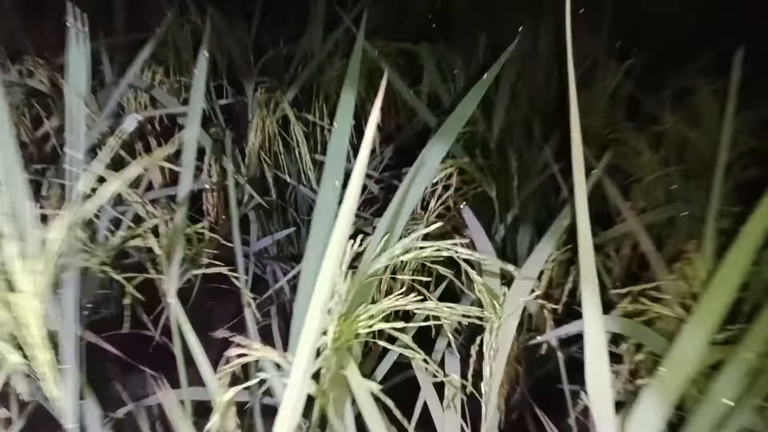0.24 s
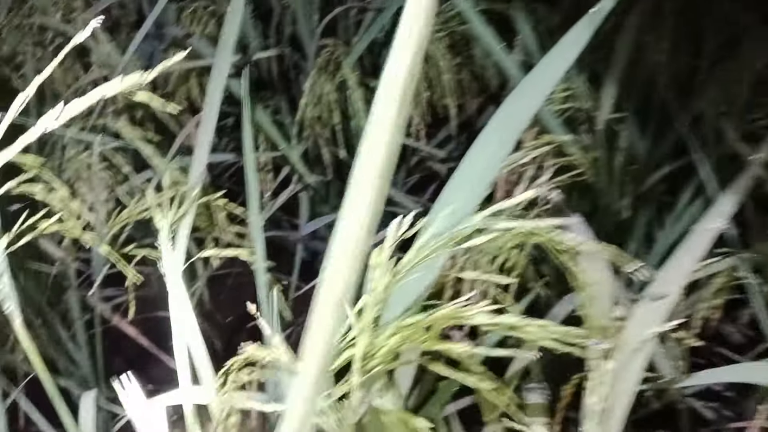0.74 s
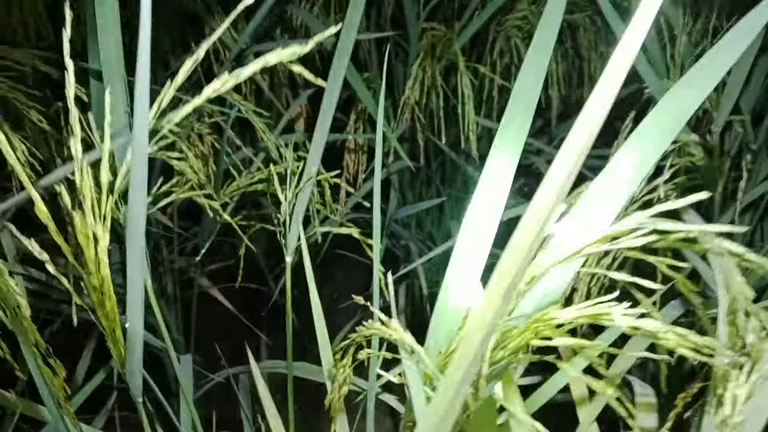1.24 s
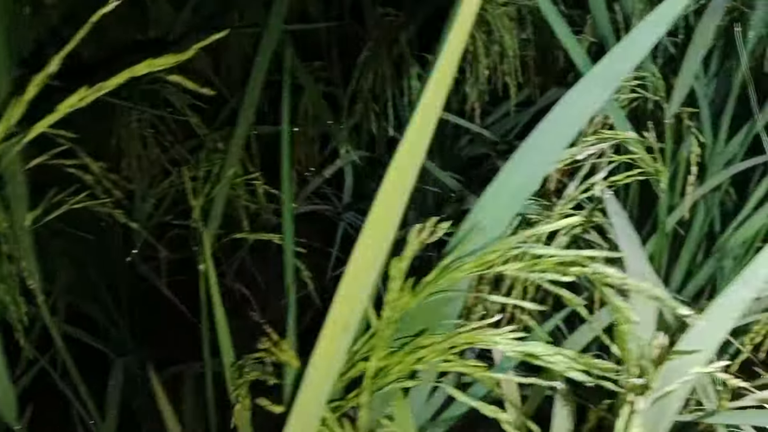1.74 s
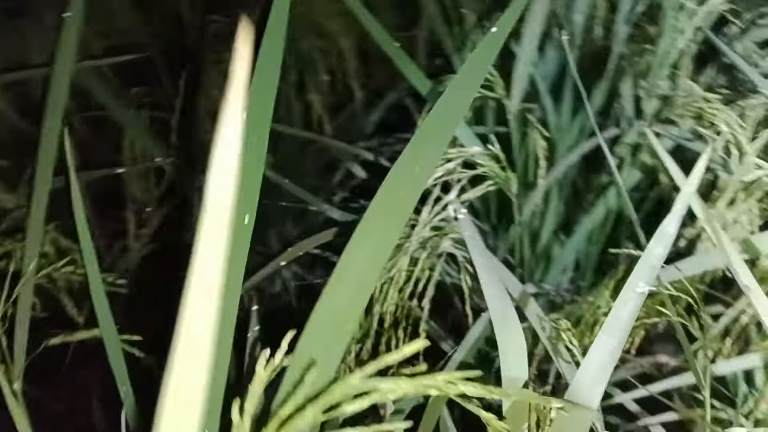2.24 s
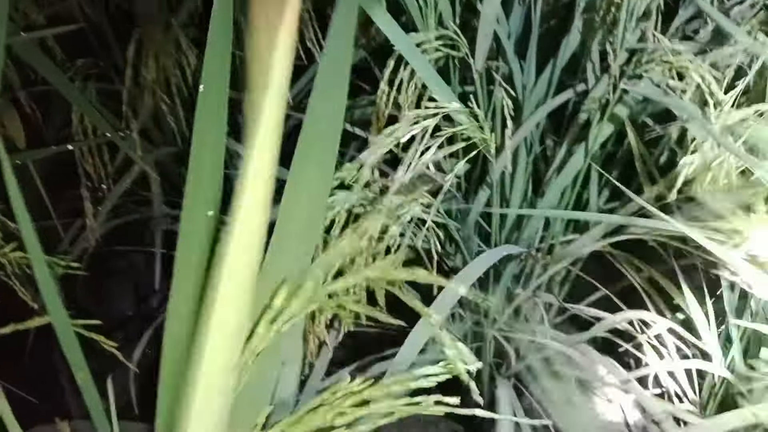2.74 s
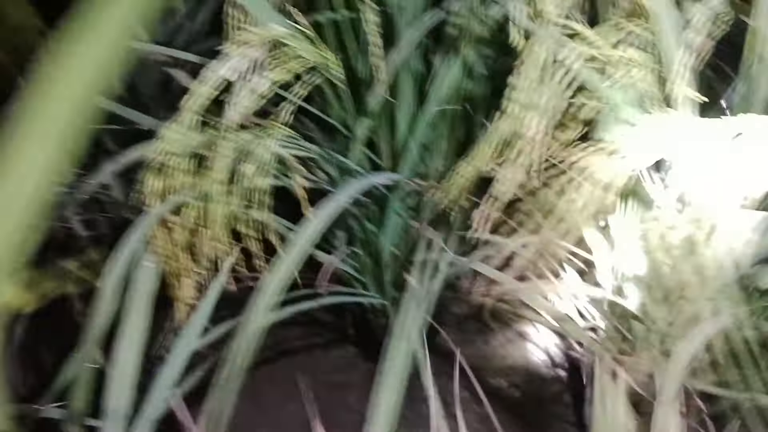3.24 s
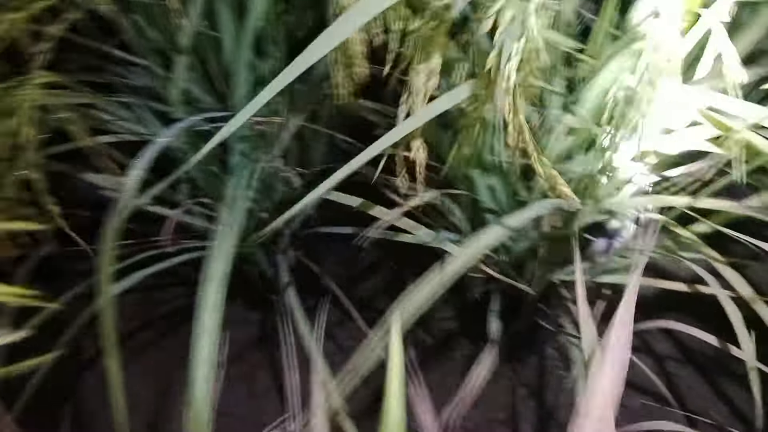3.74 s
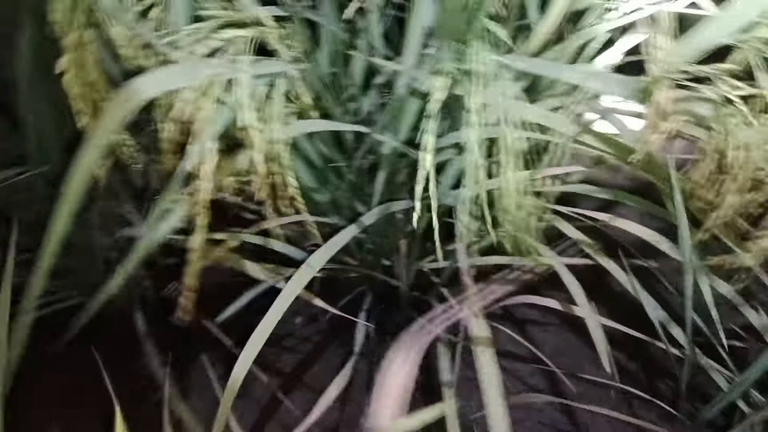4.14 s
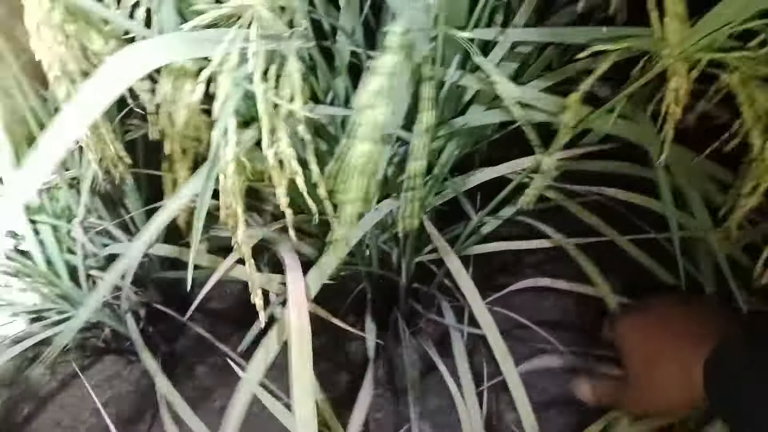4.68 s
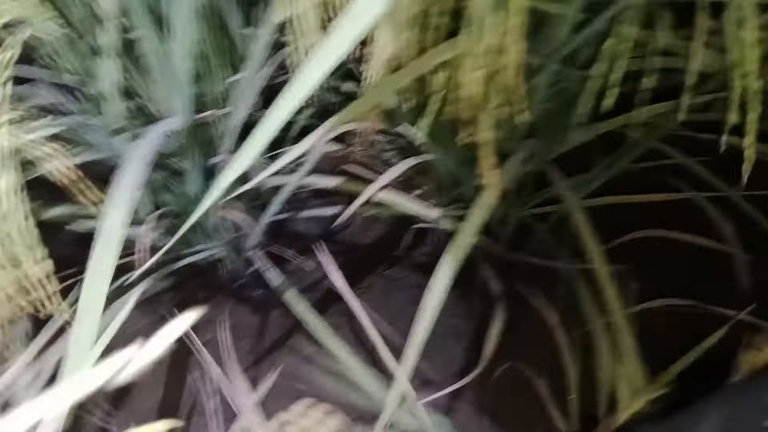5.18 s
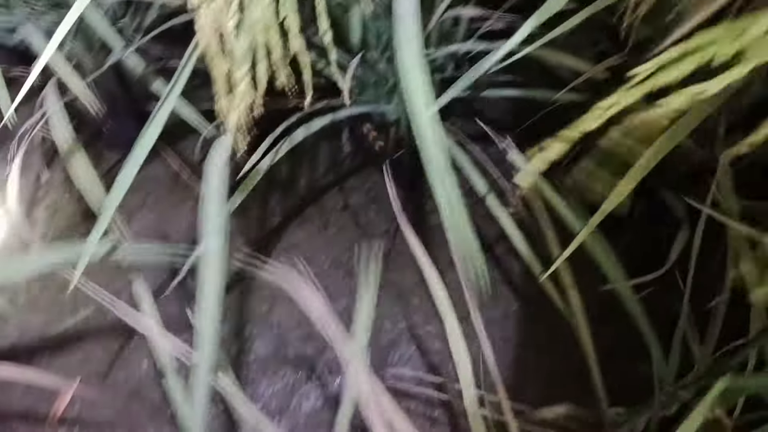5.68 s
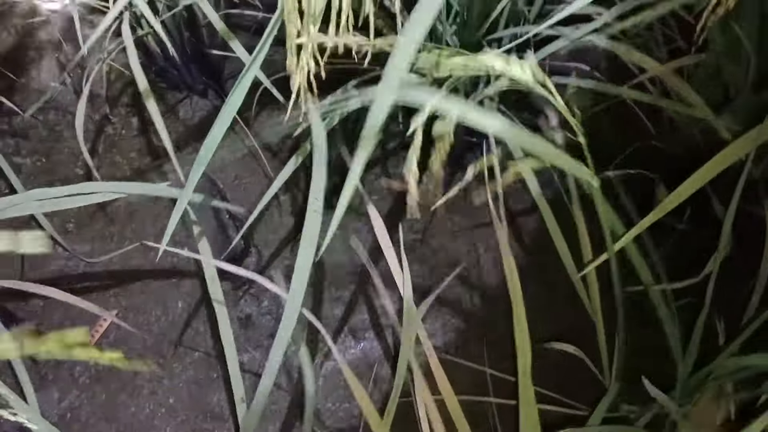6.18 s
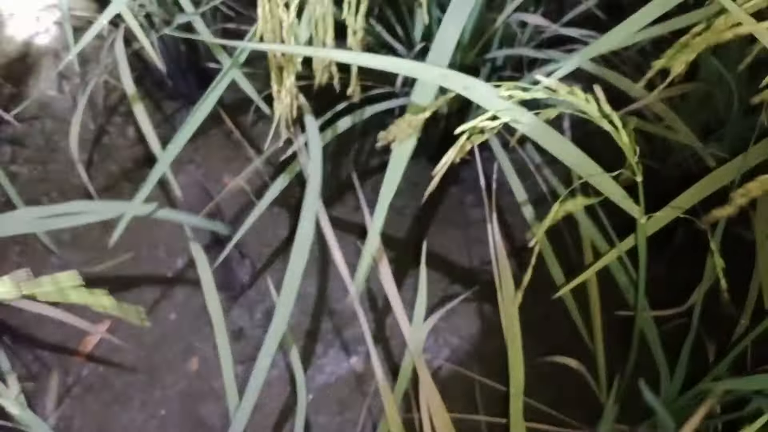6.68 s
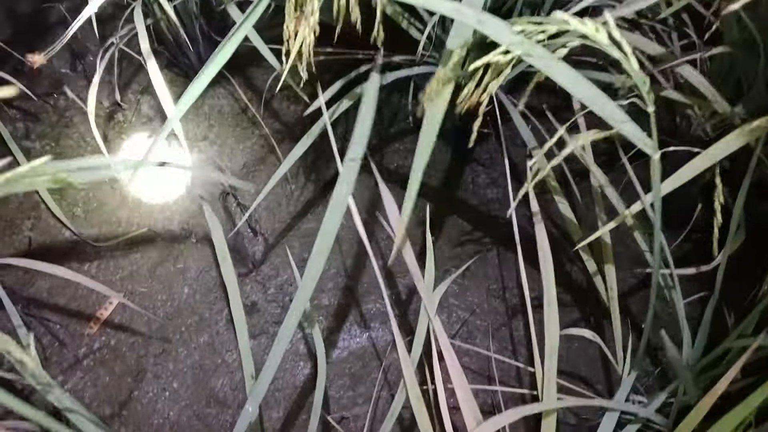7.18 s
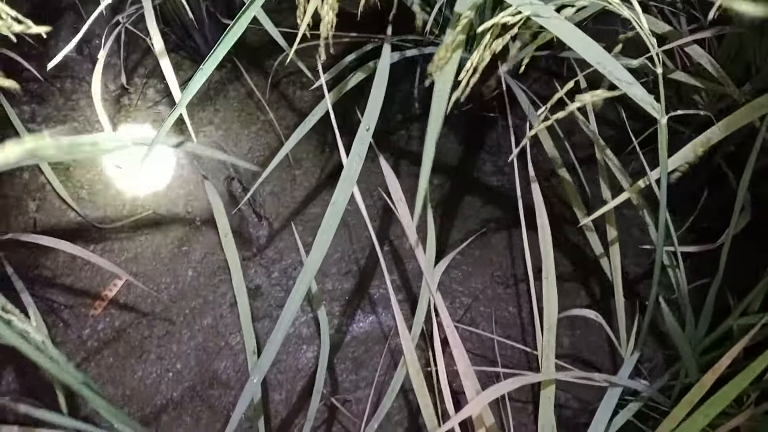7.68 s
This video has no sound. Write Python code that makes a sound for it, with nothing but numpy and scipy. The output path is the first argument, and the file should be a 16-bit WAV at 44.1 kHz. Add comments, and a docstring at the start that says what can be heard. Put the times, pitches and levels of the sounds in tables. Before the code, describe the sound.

Night in a rice paddy, heard close on a small handheld microphone. A mole cricket's rapid, rough trill runs throughout, with a higher, slower tree cricket pulsing in bouts behind. Leaves hiss and rustle at first, nearly stop, then swish strongly as a hand pushes through the stalks, with a cluster of dull knocks past five seconds. The rustling then fades, leaving insects, small leaf ticks and faint low air puffs.

```python
"""A mole cricket trills close by over the hiss of rice leaves, with a tree cricket trilling in bouts behind it.
It is night in a paddy: a hand pushes through the rice, stalks swish and knock, air buffets the microphone.
The crickets are trains of short swelling tones; other insects pipe single gliding notes.
Leaves, stalks and ears of grain are coloured noise mixed with clumped bursts; flicks are short bursts of noise.
Bumped stalks are damped sines with a noise snap; puffs and the far chorus are shaped noise."""
import sys
import numpy as np
from scipy import signal
from scipy.fft import rfft, irfft, next_fast_len
from scipy.io import wavfile
from scipy.ndimage import uniform_filter1d, map_coordinates

SR = 44100
rng = np.random.default_rng(int(sys.argv[2]) if len(sys.argv) > 2 else 0)


def convert_level_to_amplitude(level_db):
    """Map a level in decibels to its linear amplitude factor."""
    exponent = np.asarray(level_db, float) / 20
    return 10 ** exponent


def generate_wav(sig):
    """Save sig (samples, or channels by samples) to the path in sys.argv[1] as 16-bit PCM at SR."""
    pcm = np.round(np.clip(np.atleast_2d(sig).T, -1, 1) * 32767).astype(np.int16)
    wavfile.write(sys.argv[1], SR, pcm)


N = 349166  # samples, about 7.92 s


def unit(x):
    """Scaled to rms 1."""
    return x / np.sqrt(np.mean(x ** 2) + 1e-20)


def curves(rows):
    """One value per sample for each column after the time."""
    s, *columns = np.transpose(rows)
    return [np.interp(np.arange(N) / SR, s, column) for column in columns]


def wobble(rate):
    """A smooth random curve, rate knots a second."""
    knots = rng.standard_normal(int(N * rate / SR) + 4)
    return map_coordinates(knots, [np.arange(N) * rate / SR])


def filtered(x, gain_db):
    """x with a gain in dB that depends on frequency."""
    size = next_fast_len(N + 8192)
    gain = convert_level_to_amplitude(gain_db(np.fft.rfftfreq(size, 1 / SR)))
    return irfft(rfft(x, size) * gain, size)[:N]


def coloured(x, points):
    """x shaped by (Hz, dB) points on a log pitch axis, all but silent outside them, rms 1."""
    f, db = np.transpose(points)
    return unit(filtered(x, lambda hz: np.interp(np.log(hz + 1), np.log(f), db, -120, -120)))


def strokes(beat, first):
    """Stroke times: the moments at which the summed beat rate passes whole numbers."""
    s, rate = np.transpose(beat)
    t = np.arange(first, s[-1], 1 / SR)
    count = np.cumsum(np.interp(t, s, rate)) / SR
    return np.interp(np.arange(int(count[-1]) + 1), count, t)


def placed(s, shapes):
    """Rows of samples summed at their start times."""
    at = np.round(np.asarray(s) * SR).astype(int)[:, None] + np.arange(shapes.shape[1])
    inside = (at >= 0) & (at < N)
    return np.bincount(at[inside], shapes[inside], N)


def wing(s, hz, phase, glide_hz, rise, fall, flat, jitter, scatter_db, scatter_hz):
    """Wing strokes peaking near s, with the given phase at s: the tone swells, glides and dies."""
    chance = rng.standard_normal((len(s), 3))
    t = np.arange(-round(3 * rise * SR), round(3 * fall * SR)) / SR
    late = t - jitter * chance[:, 1:2]
    swell = np.exp(-.5 * np.abs(late / np.where(late < 0, rise, fall)) ** flat)
    pitch = (hz + scatter_hz * chance[:, 0])[:, None]
    turns = pitch * t + .5 * glide_hz * t ** 2 / (rise + fall)
    tone = np.sin(2 * np.pi * turns + phase[:, None])
    return placed(s + t[0], convert_level_to_amplitude(scatter_db * chance[:, 2:]) * swell * tone)


def scattered(x, t60):
    """x thrown back by the stalks: a new noise tail for each short stretch."""
    size = SR // 8
    t, fade = np.arange(size) / SR, np.hanning(2 * size + 1)[:-1]
    stretches = np.lib.stride_tricks.sliding_window_view(np.pad(x, (size, 2 * size)), 2 * size)
    parts = stretches[::size] * fade
    tails = rng.standard_normal((len(parts), size)) * convert_level_to_amplitude(-60 * t / t60)
    tails /= np.linalg.norm(tails, axis=1)[:, None]
    return placed((np.arange(len(parts)) - 1) * size / SR, signal.fftconvolve(parts, tails, axes=1))


def friction(spectrum, per_s, life, spread_db, crackle, clump_db, patchy_db, size):
    """Serrated edges catching: clumped bursts that die away over life s, mixed with patchy noise."""
    hit = rng.random(N) < per_s / SR * convert_level_to_amplitude(clump_db * wobble(30))
    catch = hit * convert_level_to_amplitude(spread_db * np.minimum(rng.exponential(size=N), 2.4))
    bursts = signal.lfilter([1], [1, -np.exp(-1 / (life * SR))], catch) * rng.standard_normal(N)
    # patches in time and pitch, narrower in pitch for a larger size
    z = signal.stft(rng.standard_normal(N), nperseg=size)[2]
    field = uniform_filter1d(rng.standard_normal(z.shape), size=5, axis=0)
    field = uniform_filter1d(field, size=4, axis=1)
    noise = signal.istft(z * convert_level_to_amplitude(patchy_db * unit(field)), nperseg=size)[1][:N]
    share = np.clip(crackle, 0, 1)  # of the power, in bursts
    return coloured(np.sqrt(share) * unit(bursts) + np.sqrt(1 - share) * unit(noise), spectrum)


# mole cricket loudness, direct and echo together: time_s, level_db
MOLE_LEVEL = [(0.0, -40), (0.09, -41.5), (0.24, -37), (0.88, -38), (1.12, -50.5), (1.36, -57),
              (1.54, -45.5), (2.25, -38), (2.44, -45.5), (2.6, -37.5), (2.84, -43.5), (3.0, -37.5),
              (3.17, -45.5), (3.86, -38), (4.17, -43.5), (4.41, -42.5), (4.7, -31.5), (5.0, -33.5),
              (5.16, -44.5), (5.27, -38.5), (5.47, -40.5), (5.89, -38), (6.72, -44), (7.54, -42),
              (7.92, -44.5)]
# its wing beat: time_s, rate_strokes_per_s
MOLE_BEAT = [(0, 124.41), (.99, 124.33), (1.98, 124.26), (2.97, 124.08), (3.96, 123.93), (4.94, 123.79),
             (5.93, 123.94), (6.92, 124.04), (7.92, 123.78)]
# its drifting song: time_s, wing_pitch_hz, echo_db (against the direct, at the usual level)
MOLE_PITCH = [(0, 2160, -11), (.3, 2139, -11), (1.3, 2178, -12), (2.0, 2148, -17), (2.8, 2141, -9),
              (3.2, 2164, -11), (3.9, 2150, -10.5), (4.8, 2141, -6), (5.05, 2155, -12), (5.2, 2134, -13.5),
              (6.7, 2096, -11), (7.92, 2136, -11)]
# spread of each stroke's random slip from the ring of the one before: time_s, slip_radians
MOLE_SLIP = [(0, 1.865), (.3, 1.35), (.95, 1.38), (1.2, 2.07), (4.7, 2.42), (4.9, 1.6), (5.1, 2.17),
             (7.92, 2.28)]
# echoes off the bank and the crop, levels against each other: delay_s, level_db
MOLE_ECHOES = [(.0039, -7.5), (.0128, -11.5), (.0205, -3.5), (.0301, -13)]


def mole_cricket():
    """Fast strokes in a burrow that rings near one pitch; echoes fill the gaps between them."""
    usual_level_db = -41
    echo_yields = .4  # dB the echo gains for each dB the song sinks
    (db,), (hz, usual_echo_db) = curves(MOLE_LEVEL), curves(MOLE_PITCH)
    echo_db = usual_echo_db - echo_yields * (db - usual_level_db)
    s = np.round(strokes(MOLE_BEAT, -.0053) * SR) / SR
    at = np.clip(np.round(s * SR).astype(int), 0, N - 1)
    slip = curves(MOLE_SLIP)[0][at] * rng.standard_normal(len(s))
    phase = 2 * np.pi * 2176 * s + np.cumsum(slip)  # slips add up against a steady 2176 Hz
    direct = unit(wing(s, hz[at], phase, glide_hz=58, rise=0.0013, fall=0.0021, flat=2.1,
                       jitter=.0001, scatter_db=0.47, scatter_hz=5))
    echo = unit(sum(convert_level_to_amplitude(level) * np.roll(direct, round(delay * SR)) for delay, level in MOLE_ECHOES))
    return convert_level_to_amplitude(db) * (direct + convert_level_to_amplitude(echo_db) * echo) / np.sqrt(1 + convert_level_to_amplitude(2 * echo_db))


# tree cricket bouts, each from first stroke to last: time_s, rate_strokes_per_s
TREE_BOUTS = [
    [(-.009, 31.56), (.37, 30.17)],
    [(.7833, 31.44), (2.4, 31.4), (3.83, 30.5), (4.1, 30.4)],
    [(4.499, 31.3), (5.628, 30.7), (6.01, 29.6)],
    [(6.3293, 31.48), (7.115, 30.84), (7.92, 30.87)],
]
# its loudness before a 4 dB trim: time_s, level_db
TREE_LEVEL = [(0, -53), (.37, -49), (.78, -60), (.95, -47), (1.3, -57.5), (1.6, -65), (2.3, -59),
              (2.6, -54.5), (3.1, -53), (3.4, -65), (3.7, -55), (4.1, -73), (5.2, -58), (5.38, -44.5),
              (5.45, -42.5), (6.0, -48), (6.33, -57), (6.42, -46), (7.0, -56), (7.92, -54.5)]


def tree_cricket():
    """Slower strokes, each gliding down in pitch, with a tail scattered by the stalks."""
    s = np.concatenate([strokes(bout, bout[0][0]) for bout in TREE_BOUTS])
    hz, phase = np.full(len(s), 3410), rng.uniform(0, 2 * np.pi, len(s))
    direct = unit(wing(s, hz, phase, glide_hz=-170, rise=0.0063, fall=0.0049, flat=2.3,
                       jitter=0.00051, scatter_db=1.1, scatter_hz=6.8))
    return convert_level_to_amplitude(curves(TREE_LEVEL)[0] - 4.0) * (direct + convert_level_to_amplitude(-6.5) * scattered(direct, t60=0.069))


# upper leaf hiss before the push swings it: time_s, level_db
LEAF_LEVEL = [(0.0, -41.5), (0.02, -40.5), (0.53, -50.5), (0.92, -42.5), (1.01, -48.5), (1.04, -45.5),
              (1.12, -55.5), (1.25, -57.5), (1.36, -47.5), (1.48, -57), (1.81, -63), (1.85, -59),
              (2.2, -59), (2.49, -40.5), (2.6, -43.5), (2.95, -39.5), (3.7, -44.5), (4.06, -62),
              (4.26, -43), (4.45, -46), (4.63, -35.5), (4.83, -47), (5.03, -36), (5.38, -38), (5.47, -41.5),
              (5.71, -42.5), (6.24, -50.5), (6.31, -46.5), (6.51, -53.5), (7.74, -70.5), (7.9, -58),
              (7.92, -62)]
# colour of the upper leaf hiss: pitch_hz, gain_db
LEAF_HIGH_COLOUR = [(6000, -81), (7300, -8), (7700, -1.5), (9000, -5), (10500, 2.5), (11700, -1.5),
                    (13000, 2), (14000, -10), (15000, 0), (15600, -9.5)]
# colour of the lower edge of the leaf hiss: pitch_hz, gain_db
LEAF_LOW_COLOUR = [(4000, -48), (5200, -18), (6200, -1), (7200, 5), (8000, -14.5), (9000, -47)]


def leaves():
    """Leaf hiss in an upper band and its lower edge, shaken by the same uneven push."""
    leaf_high_db, = curves(LEAF_LEVEL)
    # against the upper hiss: -11.5 dB when that is at -47.5 dB, gaining 0.51 dB for each dB of it
    leaf_low_db = -11.5 + 0.51 * (leaf_high_db + 47.5) + 1.8 * wobble(8)
    high = friction(LEAF_HIGH_COLOUR, per_s=220, life=0.0021, spread_db=4.5, crackle=0.16,
                    clump_db=3, patchy_db=1.2, size=256)
    low = friction(LEAF_LOW_COLOUR, per_s=200, life=0.0017, spread_db=-1.0, crackle=0.098,
                   clump_db=8.5, patchy_db=-1.0, size=512)
    push_db = 1.3 * wobble(24) + 0.42 * wobble(45)
    return convert_level_to_amplitude(leaf_high_db + push_db) * (high + convert_level_to_amplitude(leaf_low_db) * low)


# stalk rustle before its swings: time_s, middle_db, high_db and low_db (both against middle)
STALK_LEVEL = [(0.0, -51.5, -2, -7.5), (0.22, -57, -2.5, 0.5), (0.61, -59, -6.5, -13.5),
               (0.79, -67, 2.5, 3.5), (0.92, -54, -7, -4.5), (0.95, -62.5, -2, -4.5), (1.25, -85.5, 9, 0),
               (2.2, -86, 3, -1.5), (2.51, -65, 9, -2), (2.6, -61.5, 2, -19), (2.64, -64, 6, -13),
               (3.02, -62, 11.5, 0), (3.22, -56, 0.5, -11), (3.75, -55.5, -3.5, -18), (3.84, -79.5, 1, -5),
               (4.12, -83, 0, -5), (4.21, -59.5, -6, -18), (4.34, -54, -4, -15), (4.43, -63.5, -7, -4),
               (4.59, -48.5, -3.5, -7.5), (4.79, -63.5, 5, -5.5), (4.83, -60.5, -7, -14),
               (4.87, -66, 2, -1), (5.05, -49, -1.5, -10), (5.4, -51, 7, -3), (5.47, -47, -3, 1.5),
               (5.51, -55, 6.5, -4), (5.82, -57, 5, -7), (6.13, -75.5, 12, -5.5), (7.74, -91.5, 3.5, 1.5),
               (7.92, -77, 0, -12)]
# trim on the rattle of the ears of grain: time_s, level_db
EAR_LEVEL = [(0, -0.5), (.3, -6), (.7, -5), (.92, -5.5), (1.1, -9.5), (2.4, 0), (2.75, 7), (3.1, 1),
             (3.7, -2.5), (4.3, 0), (4.63, 4), (4.85, -0.5), (5.4, 2.5), (5.9, -1), (6.2, -2), (7.92, -5)]
# colour of the high band of the rustle: pitch_hz, gain_db
HIGH_COLOUR = [(900, -52), (1200, -2), (1350, 2), (1800, -4.5), (2500, -11)]
# colour of its middle band: pitch_hz, gain_db
MIDDLE_COLOUR = [(450, -62), (620, -1), (1100, 5), (1250, -3), (1600, -37.5)]
# colour of its low band: pitch_hz, gain_db
LOW_COLOUR = [(100, -19), (200, -11), (400, 2), (560, 1.5), (680, -1), (900, -46)]
# colour of the ears of grain: pitch_hz, gain_db
EAR_COLOUR = [(1500, -10.5), (2400, -0.5), (3200, 0), (4200, -3), (5500, -3), (7000, -33)]


def stalks():
    """Stalk rustle in three bands, high, middle and low, whose levels move apart; ears of grain rattle."""
    middle_db, high_db, low_db = curves(STALK_LEVEL)
    follow, lean = 0.9, 0.41  # ears follow the stalks by this share, leaves by the rest; lean to high
    ear_db = 4 + curves(EAR_LEVEL)[0] + follow * (middle_db + lean * high_db)
    ear_db = ear_db + (1 - follow) * curves(LEAF_LEVEL)[0]
    rustle = np.zeros(N)
    for share_db, colour in [(high_db, HIGH_COLOUR), (0, MIDDLE_COLOUR), (low_db, LOW_COLOUR)]:
        band = friction(colour, per_s=90, life=0.0026, spread_db=2, crackle=0.14,
                        clump_db=4.5, patchy_db=3.0, size=1024)
        rustle += convert_level_to_amplitude(middle_db + share_db + 0.91 * wobble(9)) * band
    ear = friction(EAR_COLOUR, per_s=150, life=0.0029, spread_db=6.0, crackle=0.09,
                   clump_db=3.0, patchy_db=2.5, size=512)
    return convert_level_to_amplitude(0.99 * wobble(25)) * (rustle + convert_level_to_amplitude(ear_db) * ear)


# puffs of air before their flutter: middle_s, peak_db, length_s (peak to -17 dB)
PUFFS = [(0, -61, 0.049), (0.585, -69, 0.11), (.83, -74, 0.1), (1.623, -80, 0.044), (1.875, -70.5, 0.12),
         (3.3, -70, .15), (3.541, -67, 0.073), (3.768, -68, 0.13), (3.98, -69, .06), (4.863, -66.5, 0.11),
         (5.33, -59.5, 0.16), (5.622, -62.5, 0.16), (6.054, -69, 0.073), (6.305, -69, 0.12),
         (6.482, -65, 0.055), (7.245, -61, 0.07), (7.82, -64, 0.056)]
# colour of air on the microphone: pitch_hz, gain_db
AIR_COLOUR = [(20, -39), (40, -24.5), (64, -5.5), (85, -13.5), (105, -18.5), (160, -25), (300, -69.5)]


def air():
    """Lumpy air on the microphone: bell-shaped puffs over a wandering stir, as low noise."""
    t = np.arange(N) / SR
    puffs = sum(convert_level_to_amplitude(db) * np.exp(-2 * ((t - s) / length) ** 2) for s, db, length in PUFFS)
    stir = convert_level_to_amplitude(-77.5 + 4.5 * wobble(7))
    return (puffs + stir) * convert_level_to_amplitude(2.1 * wobble(22)) * coloured(rng.standard_normal(N), AIR_COLOUR)


# colour of the night field: pitch_hz, gain_db
NIGHT_COLOUR = [(20, -40), (60, -8.5), (200, -4), (700, -28.5), (1400, -23), (1850, 6), (2400, 1),
                (2750, -37), (3300, -5), (4000, -25), (7000, -21), (8000, -9), (15600, -25)]


def far_chorus():
    """The far chorus of the field: coloured noise that hardly wavers."""
    return convert_level_to_amplitude(-66.5 + 0.45 * wobble(3)) * coloured(rng.standard_normal(N), NIGHT_COLOUR)


# stalks bumping the hand: start_s, level_db (before the rise), pitch_hz, snap_db (against level, before +6.5)
BUMPS = [(0.22, -48, 526, -10), (0.848, -36.5, 690, -25), (0.858, -39, 644, -25), (0.911, -30, 623, -4),
         (1.218, -57, 161, 6), (2.75, -52, 580, 5), (5.405, -35, 250, -8), (5.426, -33, 374, -14),
         (5.442, -30.5, 206, -10), (5.458, -28, 428, -15), (5.475, -36, 298, -8)]


def bumps():
    """A soft contact: three stalk modes, damped within a few tens of ms, and a snap of the straw."""
    s, db, hz, snap_db = np.transpose(BUMPS)[:, :, None]
    t = np.arange(2500) / SR
    rise_s, ring_t60_s, snap_t60_s = 0.0024, 0.034, 0.024
    ring = np.sin(2 * np.pi * hz * t)
    ring = ring + 0.34 * np.sin(2 * np.pi * 0.61 * hz * t) + 0.39 * np.sin(2 * np.pi * 1.85 * hz * t)
    push = convert_level_to_amplitude(db - 60 * t / ring_t60_s) * (1 - np.exp(-(t / rise_s) ** 2)) * ring
    snap = convert_level_to_amplitude(db + snap_db + 6.5 - 60 * t / snap_t60_s) * rng.standard_normal(push.shape)
    straw = signal.butter(2, [900, 3000], "band", fs=SR)
    return placed(s[:, 0], push + signal.lfilter(*straw, snap))


# leaf tips flicking free, before a 4 dB trim and the band filter: start_s, level_db
FLICKS = [(0.912, -19), (1.037, -23), (1.2865, -31.5), (1.311, -32), (1.335, -41), (1.3577, -25),
          (1.364, -32), (1.385, -42), (2.2555, -29), (3.898, -33), (3.971, -29.5), (4.862, -28),
          (4.9168, -31), (5.9898, -34), (6.3816, -26.5), (6.5061, -31), (6.8123, -36), (6.9344, -35),
          (7.227, -39), (7.3547, -35.5), (7.894, -38)]


def flicks():
    """A crack of a few ms in the leaf's colour, with a dull knock from its stalk; faint ones at random."""
    small = rng.random(size=(30, 2))
    small_s = small[:, 0] * N / SR
    small_db = -45 - 4 * np.log(small[:, 1] + .1)  # mostly near the faint end
    s, db = np.hstack([np.transpose(FLICKS), [small_s, small_db]])
    db = db[:, None]
    t = np.arange(700) / SR
    burst = rng.standard_normal((len(s), 2, len(t)))
    crack = placed(s, convert_level_to_amplitude(db - 4 - 60 * t / .016) * (1 - np.exp(-t / .0005)) * burst[:, 0])
    knock = placed(s, convert_level_to_amplitude(db - 40 - 60 * t / 0.025) * burst[:, 1])
    leaf = signal.butter(4, [7200, 14500], "band", fs=SR)
    stalk = signal.butter(2, [250, 1300], "band", fs=SR)
    return signal.lfilter(*leaf, crack) + signal.lfilter(*stalk, knock)


# single insect notes: middle_s, length_s, start_hz, end_hz, peak_db
NOTES = [(.75, .07, 3670, 3740, -66), (1.865, 0.043, 1800, 1700, -57), (2.21, 0.096, 3680, 3720, -65),
         (3.74, 0.093, 3705, 3740, -46), (6.935, .11, 3720, 3800, -53), (7.57, 0.055, 3680, 3700, -68),
         (7.575, 0.042, 1730, 1680, -63), (7.895, 0.013, 6300, 6200, -55)]


def notes():
    """Short pure notes with a straight glide, soft at both ends."""
    out = np.zeros(N)
    for s, length, start_hz, end_hz, db in NOTES:
        n = int(length * SR)
        tone = np.sin(2 * np.pi * np.cumsum(np.linspace(start_hz, end_hz, n)) / SR)
        out += placed([s - length / 2], (convert_level_to_amplitude(db) * np.sqrt(np.hanning(n)) * tone)[None])
    return out


def scene():
    """Everything reaches one microphone."""
    insects = mole_cricket() + tree_cricket() + notes() + far_chorus()
    rice = leaves() + stalks() + bumps() + flicks()
    return (insects + rice + air())[None]


# dips of the microphone housing, summed where they overlap: centre_hz, half_width_hz, depth_db
HOUSING_DIPS = [(4803, 498, -14), (4800, 79, -12.5), (9370, 137, -10.5)]


def housing(x):
    """The housing cancels two narrow bands; nothing audible passes above the band limit."""
    top_hz = 15490

    def gain_db(hz):
        dips = sum(db / (1 + ((hz - centre) / width) ** 2) for centre, width, db in HOUSING_DIPS)
        return dips - 120 * (hz > top_hz)

    return filtered(x, gain_db)


def roll_off(x):
    """The treble ends steeply here."""
    return signal.sosfilt(signal.butter(12, 15830, fs=SR, output="sos"), x)


def record(dry):
    """The scene as heard through the microphone housing."""
    heard = housing(dry[0])
    return roll_off(heard[None])


dry = scene()
out = record(dry)
generate_wav(out)
```